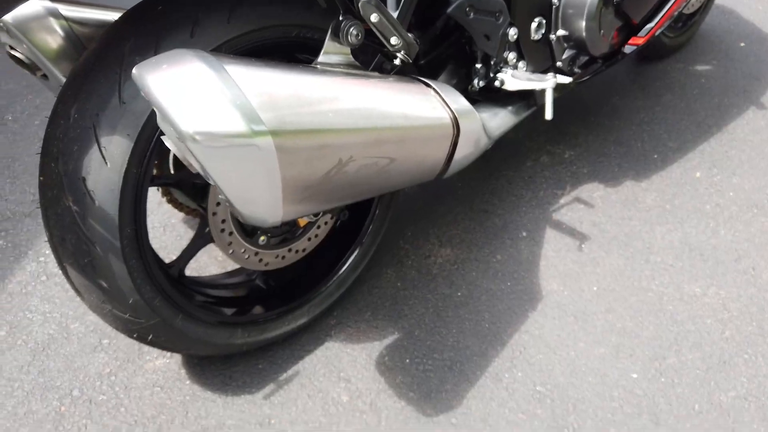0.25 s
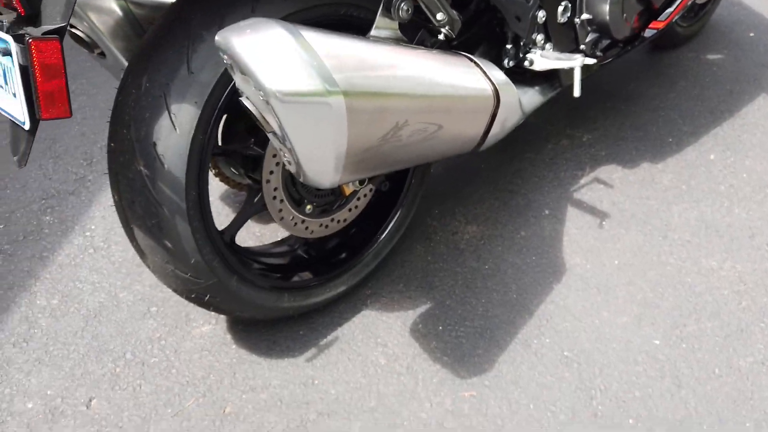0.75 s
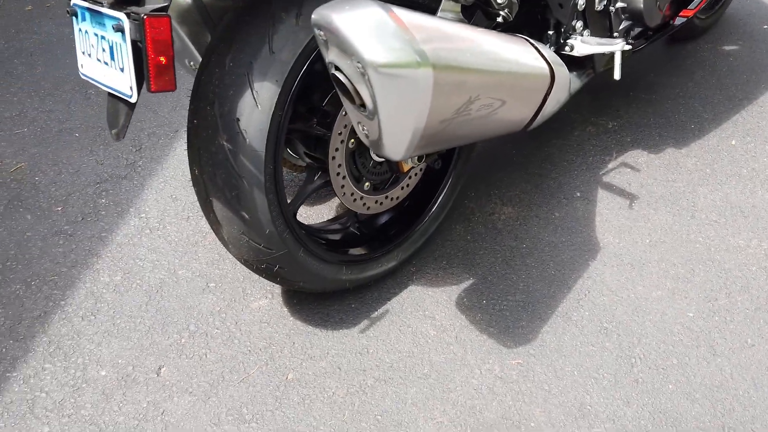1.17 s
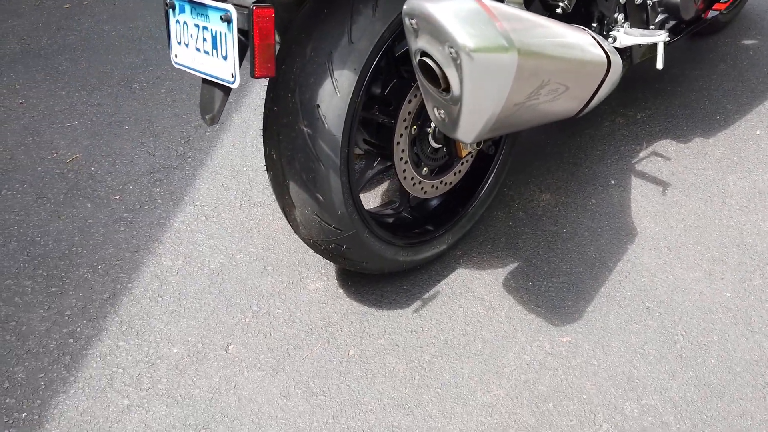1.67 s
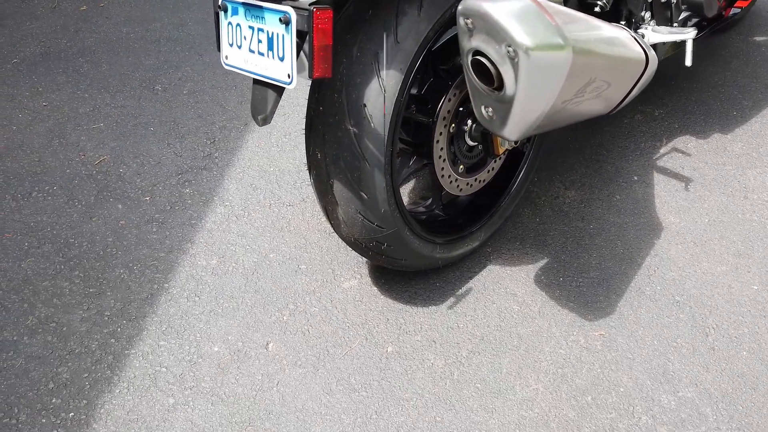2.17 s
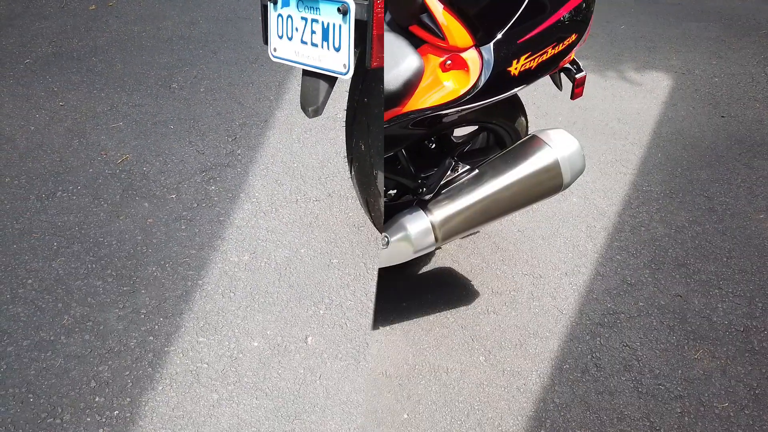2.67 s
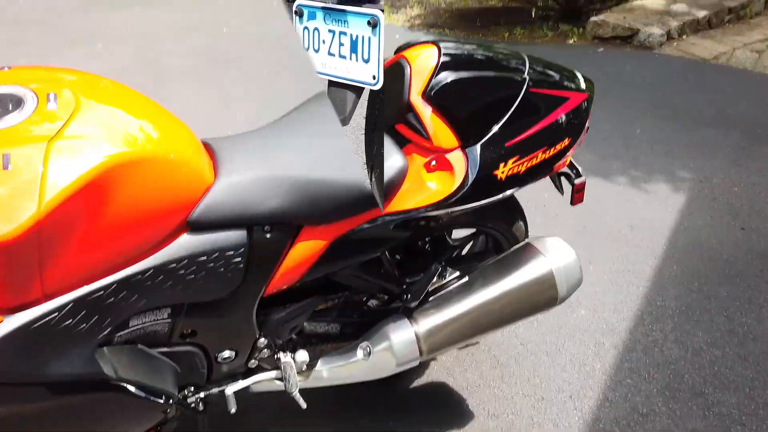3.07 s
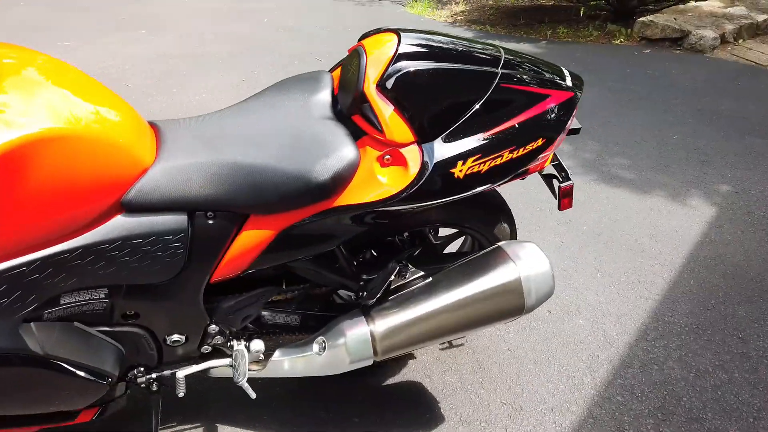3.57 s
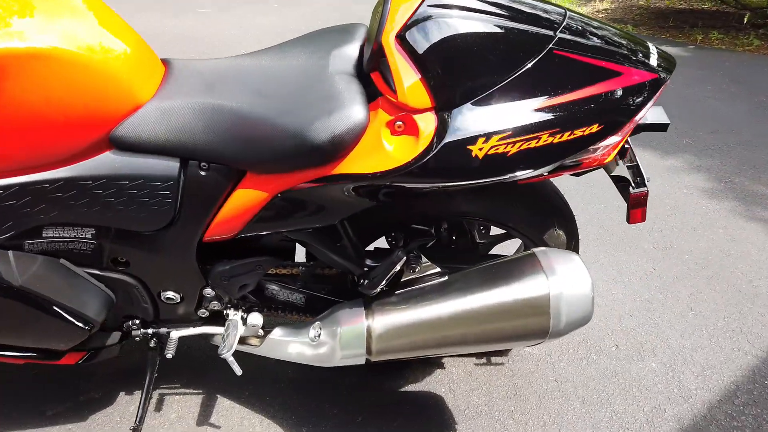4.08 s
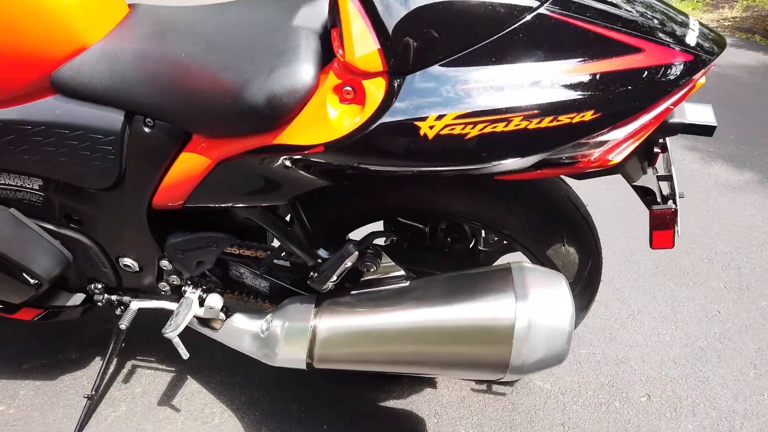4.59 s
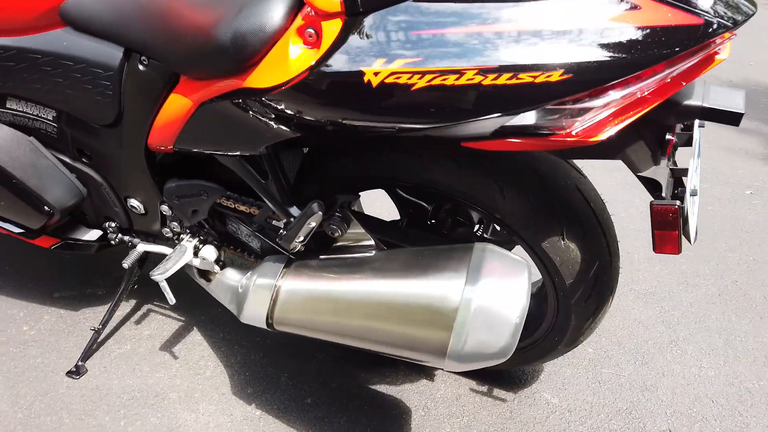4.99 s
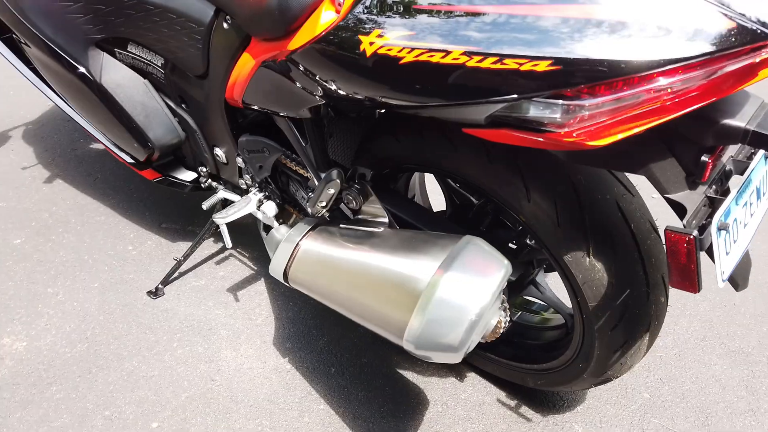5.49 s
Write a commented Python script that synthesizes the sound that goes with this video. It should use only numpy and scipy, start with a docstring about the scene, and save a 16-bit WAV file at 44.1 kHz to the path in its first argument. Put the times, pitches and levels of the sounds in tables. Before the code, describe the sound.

A four-cylinder motorcycle idles with a deep exhaust boom, then abruptly changes to a slightly slower idle with more valve clatter.

```python
"""A four-cylinder motorcycle idles on a driveway, heard first from beside the silencer mouth.
Every firing pushes out a low boom, rings the pipe and lets out a puff of gas, while the engine's
metal parts tick and clatter. After an abrupt cut, a slightly slower idle is heard from the flank
(the bike's side), where the valves rattle. The sounds swell and fade as the listener walks along."""
import sys
import numpy as np
from scipy import signal
from scipy.fft import rfft, irfft
from scipy.io import wavfile
from scipy.ndimage import uniform_filter1d, map_coordinates

SR = 44100
rng = np.random.default_rng(int(sys.argv[2]) if len(sys.argv) > 2 else 0)


def digitize_waveform(pressure):
    """Quantize a signal to 16-bit integers and store it at the path in sys.argv[1].

    Rows of a 2-D input are taken as channels; values are limited to [-1, 1].
    """
    field = np.atleast_2d(pressure).T
    bounded = np.clip(field, -1, 1)
    quanta = np.round(bounded * 32767).astype(np.int16)
    wavfile.write(sys.argv[1], SR, quanta)


N = 253134
TIME = np.arange(N) / SR
FREQS = np.maximum(np.fft.rfftfreq(N, 1 / SR), 1)
CUT_S, TOP_HZ, SURGE_MEMORY_S = 2.7153, 15850, 0.7

# REAR tables are for the spot by the silencer, FLANK tables for the bike's side.
# Engine speed. Each row: time in seconds, firings per second.
REAR_SPEED = [(0.0, 54.2), (0.44, 55.91), (0.86, 56), (1.07, 58.13), (1.25, 57.13), (1.41, 55.99),
              (1.65, 57.19), (1.69, 54.71), (1.88, 57.77), (2.14, 56.02), (2.24, 58.64), (2.32, 56.16),
              (2.7, 57.03)]
FLANK_SPEED = [(2.74, 51.39), (3.31, 54.58), (3.41, 51.5), (3.77, 52.9), (3.81, 50.9), (4.13, 54.67),
               (4.44, 50.6), (4.72, 55.48), (5.0, 51.56), (5.08, 53), (5.73, 51.6)]
# Exhaust layers: the boom's harmonics from the lowest up, then the pipe. Each row: start level in dB,
# end level in dB, then a swell's height in dB (a dip if negative), time and half length in seconds.
REAR_EXHAUST = [(-8, -9, 1.55, 0.97, 0.68), (-24.5, -21.5, -2, 0.82, 0.39), (-30.5, -25.5, -3, 1.1, 0.62),
                (-27.5, -31.5, 2, 1.33, 0.43)]
FLANK_EXHAUST = [(-24, -15, -1.2, 4.2, 0.61), (-31, -21, -4, 3.7, 0.53), (-29.5, -36.5, 5.5, 4.3, 0.67),
                 (-46, -49, 9, 5.03, 0.42), (-39.5, -38, -1.5, 4.54, 0.61)]
# How those layers follow a surge in speed. One number each: dB per extra firing per second.
REAR_SURGE = [0.14, -0.69, -2.3, 1.6]
FLANK_SURGE = [-0.059, .1, -1.16, 0.68, 0.33]
# The pipe's overtones. Each row: multiple of the firing rate, relative level in dB.
REAR_OVERTONES = [(4, -37.5), (5, -24.5), (6, -33.5), (6.5, -34), (7, -26), (8, -32), (9, -44.5)]
FLANK_OVERTONES = [(4.5, -37), (5, -28), (5.5, -41), (6, -28.5), (6.5, -42), (7, -30), (8, -31.5),
                   (8.5, -40), (9, -34.5)]
# How the pipe answers uneven firings. Each row: frequency in Hz, relative level in dB.
REAR_PIPE = [(15, 15.5), (32, -10), (80, -24), (140, 11), (205, -17), (250, -19.5), (290, 1.5), (400, 3.5),
             (460, 1.5), (560, -12.5), (800, -42.5)]
FLANK_PIPE = [(15, 1), (30, 7), (80, 5), (140, 3.5), (200, 2.5), (260, -3.5), (340, 2), (420, -3),
              (540, -3), (800, -30)]
# Engine parts: crankcase knock, clutch rattle, valve clatter, chain sizzle, gas hiss. Each row: start
# and end levels in dB, then, if it swells or dips, height in dB, time and half length in seconds.
REAR_PARTS = [(-39, -43), (-42.5, -47), (-47, -50.5, -4, 1.2, .5), (-46, -48.5), (-43.5, -48.6)]
FLANK_PARTS = [(-44, -40.5, -5.5, 4.05, 0.72), (-44, -38.5, 4, 4.23, 0.38), (-39.5, -43.5, 1.4, 4, 0.34),
               (-49.5, -50, 3, 4.6, 0.32), (-47.5, -53.5, 0.9, 4.2, 0.39)]
# The edges of those five parts' frequency bands, in Hz.
PART_EDGES_HZ = [540, 1150, 1700, 2350, 4500, 15800]
# Relative strength of the four cylinders in firing order, on a decibel-like scale.
CYLINDER_STRENGTH = [0, 1, -2.5, -1]
# Tone colour of the engine parts. Each row: frequency in Hz, relative level in dB.
REAR_COLOUR = [(260, -32), (450, 0), (606, -18), (961, -16), (1150, -23.5), (1640, -21), (1960, -24.5),
               (2240, -25), (2450, -22), (3160, -27), (4380, -31.5), (6540, -36.5), (9200, -35.5),
               (11300, -32.5), (15700, -37)]
FLANK_COLOUR = [(260, -34), (450, -11), (499, -8.5), (724, -9.5), (840, -9.5), (1350, -7), (1480, -6.5),
                (1880, -4), (2080, -3), (2560, -20), (3400, -19.5), (4310, -23.5), (7820, -29.5),
                (11700, -27), (15700, -31.5)]
# Ringing metal panels. Each row: frequency in Hz, width in Hz, boost in dB.
REAR_PANELS = [(780, 61, 2.5), (1054, 16, 6.5), (1620, 160, 1.5), (2435, 36, 8), (2830, 230, 2),
               (6620, 830, 3.5), (11200, 890, 4.5)]
FLANK_PANELS = [(720, 350, 3.7), (1380, 72, 8.8), (1607, 53, 8.8), (1820, 84, 5.7), (1944, 80, 5.6),
                (2710, 79, 10.4), (3610, 900, 5.7), (11000, 6300, 4.9)]
# Stereo width. Each row: frequency in Hz, level in dB of side (left minus right) against mid (their sum).
REAR_WIDTH = [(55, -35.5), (160, -35), (400, -23), (800, -41), (1300, -19.5), (1800, -13.5), (2300, -7),
              (3000, -4.5), (4000, -4.5), (7000, -4.5), (11000, 0.5), (15000, -3.0)]
FLANK_WIDTH = [(55, -28.5), (160, -27.0), (400, -18), (800, -15.5), (1300, -13), (1800, -16), (2300, 6.5),
               (3000, -1.5), (4000, -5), (7000, -2.5), (11000, -1), (15000, -4)]
# Panels and gaps that sing in one direction. Each row: loudest moment in seconds,
# half length in seconds, pitch in Hz, half width in Hz, peak level in dB.
SINGING_PANELS = [(0.2, 0.19, 2830, 35, -50), (1.798, 0.36, 1690, 32.02, -53),
                  (2.94, 0.25, 780, 81.3, -45.5), (3.35, 0.45, 4500, 500, -56), (3.4, 0.52, 2170, 50, -50),
                  (3.697, 0.39, 339.7, 44.7, -41), (3.86, 0.2, 11710, 700, -51.5),
                  (4.337, 0.078, 2773, 45, -50), (4.804, 0.11, 2157, 60, -44),
                  (4.814, 0.19, 1120, 160.3, -46), (5.245, 0.24, 1334, 65, -40)]


def undb(db):
    """Turn decibels into a gain."""
    return 10 ** (np.asarray(db) / 20)


def unit(x):
    """Scale a signal to an average (rms) level of 1."""
    return x / np.sqrt(np.mean(x ** 2))


def response(points):
    """Gain at every frequency, from rows of Hz and dB."""
    hz, db = np.transpose(points)
    return undb(np.interp(np.log(FREQS), np.log(hz), db))


def ring(x, gain):
    """Filter a sound so that it rings after a blow, never before."""
    cepstrum = np.fft.irfft(np.log(gain + 1e-6), N)
    cepstrum[1:N // 2] *= 2
    cepstrum[N // 2 + 1:] = 0
    return irfft(rfft(x) * np.exp(rfft(cepstrum)), N)


def swell(height, at, half_length):
    """A smooth, bell-shaped rise and fall in time."""
    return height * np.exp(-.5 * ((TIME - at) / half_length) ** 2)


def along_walk(rows, start, end):
    """Each layer's level in dB glides as the listener walks, and may swell or dip once on the way."""
    return np.array([np.interp(TIME, [start, end], [first, last]) + (swell(*bump) if bump else 0)
                     for first, last, *bump in rows])


def firing_rate(speed):
    """Firings per second at every sample."""
    return np.interp(TIME, *np.transpose(speed))


def count_firings(speed):
    """A running count of firings, shifted so that the cut falls just after one."""
    count = np.cumsum(firing_rate(speed)) / SR
    return count - count[int(CUT_S * SR)] % 1 + 1 + 1 / 12


def surging(speed, db_per_hz):
    """A surge in speed thins the boom's third harmonic and lifts the pipe's hum and burble (in dB)."""
    hz = firing_rate(speed)
    return np.outer(db_per_hz, hz - uniform_filter1d(hz, int(SURGE_MEMORY_S * SR)))


def per_firing(firings):
    """A fresh random value at each firing, joined smoothly."""
    return map_coordinates(rng.standard_normal(512), [firings], order=2, mode="nearest")


def boom(firings, levels, sway_db, scatter_db):
    """Each firing pushes air out of the silencer, making a deep tone and its harmonics."""
    phase = 2 * np.pi * firings
    # the deepest tone sways about once in eight or nine firings
    sway = sway_db * np.sin(phase / 8.7 + 1.7 * per_firing(firings / 8))
    out = 0
    for k, db in enumerate(levels, 1):
        gain = undb(db + sway * (k == 1) + k * scatter_db * per_firing(firings))
        out = out - np.sqrt(2) * gain * np.cos(k * phase)
    return out


def pipe_hum(firings, overtones, flutter_db, jitter, lag):
    """The pipe's overtones waver because each firing comes a little early or late."""
    phase = 2 * np.pi * firings + jitter * (per_firing(firings) + 2.7 * per_firing(firings / 6))
    # the silencer's chambers hold the higher overtones back
    hum = sum(undb(db) * np.cos(k * phase - lag * k ** 2) for k, db in overtones)
    return unit(hum * undb(flutter_db * per_firing(firings)))


def pipe_burble(firings, pipe, gas_db):
    """Firings are never quite alike: each rings the pipe and drags swirling gas behind it."""
    onsets = np.diff(np.floor(firings), prepend=np.floor(firings[0]))
    blows = onsets * per_firing(firings)
    gas = rng.standard_normal(N) * np.exp(-(firings % 1) / 1.9)
    return unit(ring(unit(blows) + undb(gas_db) * unit(gas), response(pipe)))


def exhaust_stereo(mid, width):
    """The exhaust's long waves reach left and right only slightly out of step."""
    side = irfft(1j * rfft(mid) * response(width), N)
    return np.array([mid + side, mid - side])


def cylinder_strength(firings):
    """Strength of the cylinder whose turn it is."""
    return np.interp(firings, np.arange(4), CYLINDER_STRENGTH, period=4)


def pulse(firings):
    """A wave that peaks just after each firing."""
    return np.cos(2 * np.pi * (firings - .1))


def metal_ticks(firings, pulse_db, scatter_db, grain_db, repeat_share):
    """Valves, chain and gears tick, partly the same way on every camshaft turn (four firings)."""
    cam_turn = rng.standard_normal(2400)
    cam_position = firings / 4 % 1 * len(cam_turn)
    loop = unit(map_coordinates(cam_turn, [cam_position], order=3, mode="wrap"))
    repeating = np.sqrt(repeat_share) * np.array([loop, np.roll(loop, SR // 100)])
    fresh = np.sqrt(1 - repeat_share) * rng.standard_normal((2, N))
    hardness = np.repeat(rng.standard_normal(N // 32 + 1), 32)[:N]  # some ticks hit harder
    beat_db = pulse_db * pulse(firings) + 0.065 * cylinder_strength(firings)
    random_db = scatter_db * per_firing(firings) + grain_db * hardness
    return (fresh + repeating) * undb(beat_db + random_db)


def gas_hiss(firings, puff_db):
    """Gas puffs with each firing, and its level wanders from one camshaft turn to the next."""
    beat_db = puff_db * pulse(firings) + 0.36 * cylinder_strength(firings)
    random_db = 0.86 * per_firing(firings) + 0.64 * per_firing(firings / 5)
    return rng.standard_normal((2, N)) * undb(beat_db + random_db)


def engine_clatter(ticks, hiss, levels, colour, panels, width):
    """Ticks and hiss ring the engine's panels; each part sounds in its own frequency band."""
    panel_db = sum(db / (1 + (2 * (FREQS - hz) / wide) ** 2) for hz, wide, db in panels)
    body = response(colour) * undb(panel_db)
    spread = np.array([np.ones(len(FREQS)), response(width)])
    drives = [rfft(ticks)] * 4 + [rfft(hiss)]
    out = 0
    for drive, low, high, db in zip(drives, PART_EDGES_HZ, PART_EDGES_HZ[1:], levels):
        band = 1 / (1 + (low / FREQS) ** 20) / (1 + (FREQS / high) ** 20)
        mid, side = irfft(drive * body * band * spread, N)
        out = out + undb(db) * np.array([mid + side, mid - side]) / np.std(mid)
    return out


def reflections(x, patchy_db, spacing_hz=60):
    """Echoes off ground and bodywork give the clatter narrow peaks that shift as the listener moves."""
    hz, times, spectra = signal.stft(x, SR, nperseg=2048)
    # each peak lasts about a fifth of a second
    place = np.meshgrid(np.log1p(hz / 4000) * 4000 / spacing_hz, times * 5, indexing="ij")
    # rough asphalt scatters the treble, so the peaks are lower there
    depth_db = patchy_db / np.sqrt(1 + (hz[:, None] / 4500) ** 2)
    peaks = undb(depth_db * map_coordinates(rng.standard_normal((256, 32)), place, order=2, mode="mirror"))
    peaks /= np.sqrt(np.mean(peaks ** 2, axis=1, keepdims=True))
    return signal.istft(spectra * peaks, SR, nperseg=2048)[1][:, :N]


def at_silencer():
    """Close to the pipe's mouth the boom covers nearly everything."""
    firings = count_firings(REAR_SPEED)
    *boom_db, pipe_db = along_walk(REAR_EXHAUST, 0, CUT_S) + surging(REAR_SPEED, REAR_SURGE)
    low = boom(firings, boom_db, sway_db=0.5, scatter_db=0.47)
    hum = undb(-1.5) * pipe_hum(firings, REAR_OVERTONES, flutter_db=1.5, jitter=0.044, lag=0.357)
    burble = undb(-3.5) * pipe_burble(firings, REAR_PIPE, gas_db=25)
    exhaust = exhaust_stereo(low + undb(pipe_db) * (hum + burble), REAR_WIDTH)
    ticks = metal_ticks(firings, pulse_db=0.5, scatter_db=0.63, grain_db=1.0, repeat_share=0.31)
    hiss = gas_hiss(firings, puff_db=1.5)
    parts_db = along_walk(REAR_PARTS, 0, CUT_S)
    clatter = engine_clatter(ticks, hiss, parts_db, REAR_COLOUR, REAR_PANELS, REAR_WIDTH)
    return exhaust + reflections(clatter, patchy_db=3.0)


def singing_panels():
    """Shaken panels and gaps sing in narrow directions, so each swells as the listener walks by."""
    out = 0
    for at, half_length, hz, half_width, db in SINGING_PANELS:
        resonance = 1 / (1 + ((FREQS - hz) / half_width) ** 2) ** 2
        song = unit(irfft(rfft(rng.standard_normal(N)) * resonance, N))
        out = out + song * swell(undb(db), at, half_length)
    return out


def at_flank():
    """Beside the engine the boom is weaker and steadier, and the valves stand out."""
    firings = count_firings(FLANK_SPEED)
    *boom_db, pipe_db = along_walk(FLANK_EXHAUST, CUT_S, N / SR) + surging(FLANK_SPEED, FLANK_SURGE)
    low = boom(firings, boom_db, sway_db=0.1, scatter_db=0.41)
    hum = undb(-4.0) * pipe_hum(firings, FLANK_OVERTONES, flutter_db=0.8, jitter=0.019, lag=0.252)
    burble = undb(-1.5) * pipe_burble(firings, FLANK_PIPE, gas_db=8)
    exhaust = exhaust_stereo(low + undb(pipe_db) * (hum + burble), FLANK_WIDTH)
    ticks = metal_ticks(firings, pulse_db=-0.1, scatter_db=0.7, grain_db=1.06, repeat_share=0.35)
    hiss = gas_hiss(firings, puff_db=1.1)
    parts_db = along_walk(FLANK_PARTS, CUT_S, N / SR)
    clatter = engine_clatter(ticks, hiss, parts_db, FLANK_COLOUR, FLANK_PANELS, FLANK_WIDTH)
    return exhaust + reflections(clatter, patchy_db=2.4)


def scene():
    """The first idle breaks off in mid-pulse, which makes a click, and the second takes over."""
    return np.where(TIME < CUT_S, at_silencer(), at_flank()) + singing_panels()


def record(dry):
    """Cut away the highest treble."""
    return signal.sosfilt(signal.ellip(10, .2, 80, TOP_HZ, fs=SR, output="sos"), dry)


dry = scene()
out = record(dry)
digitize_waveform(out)
```